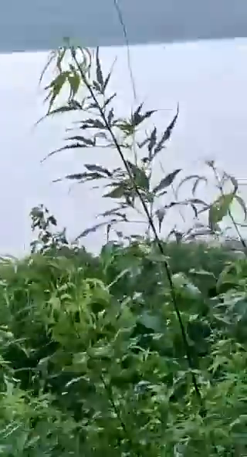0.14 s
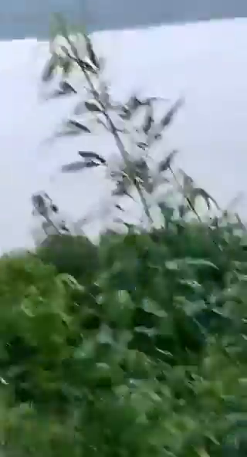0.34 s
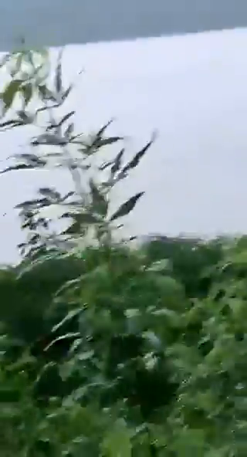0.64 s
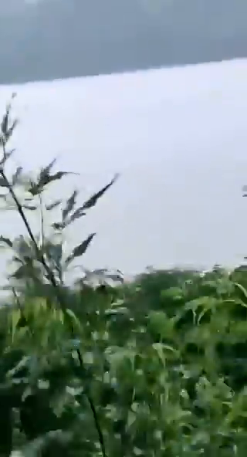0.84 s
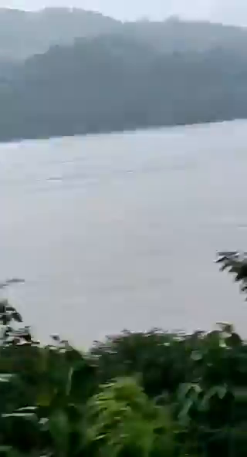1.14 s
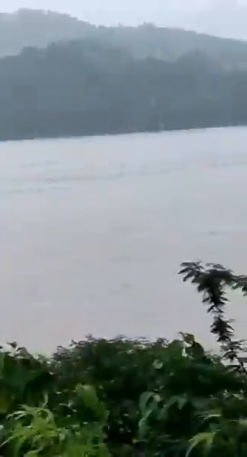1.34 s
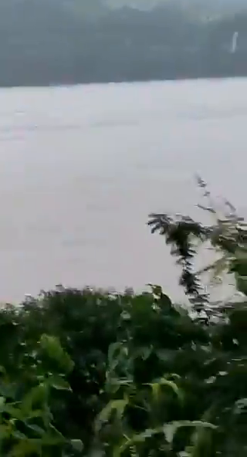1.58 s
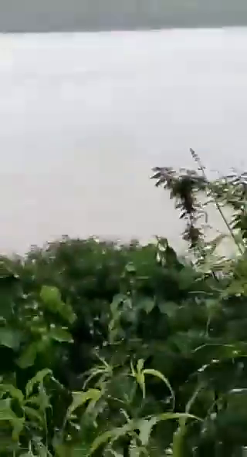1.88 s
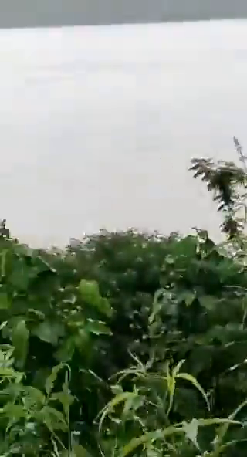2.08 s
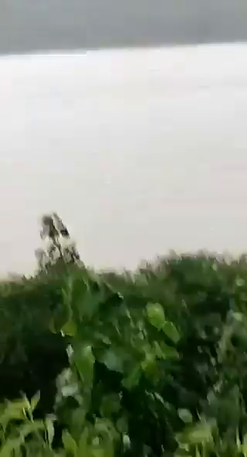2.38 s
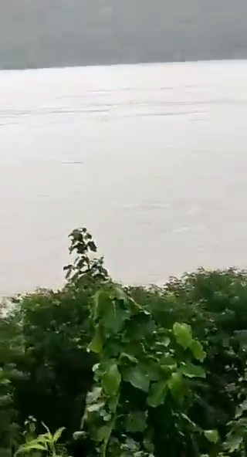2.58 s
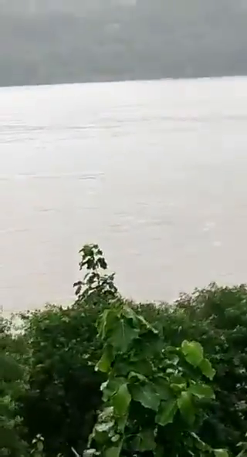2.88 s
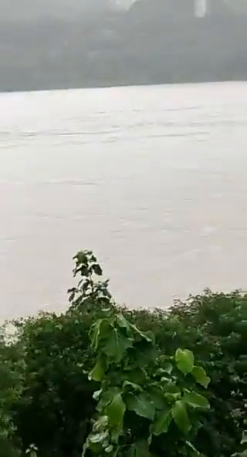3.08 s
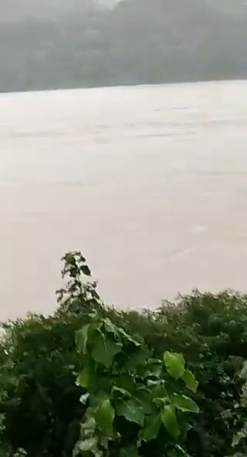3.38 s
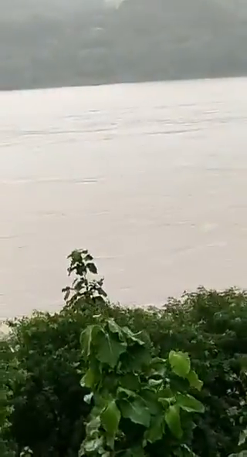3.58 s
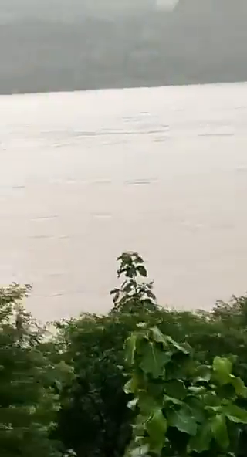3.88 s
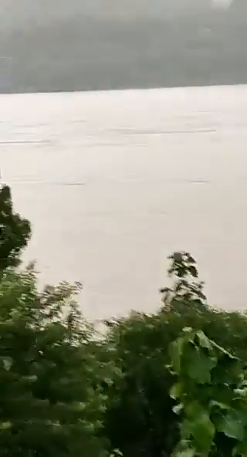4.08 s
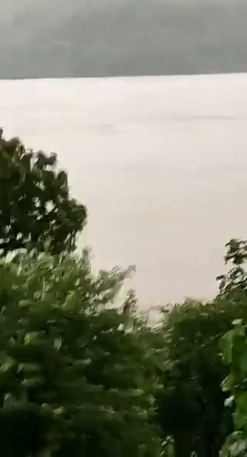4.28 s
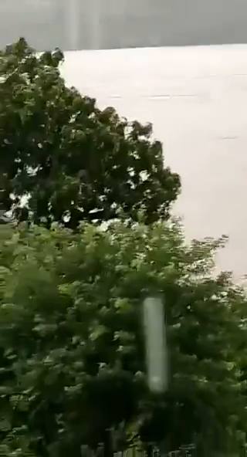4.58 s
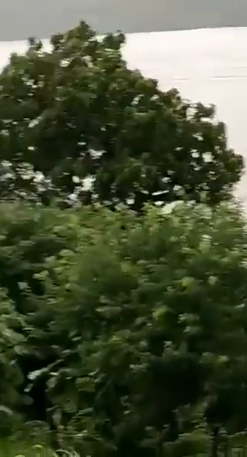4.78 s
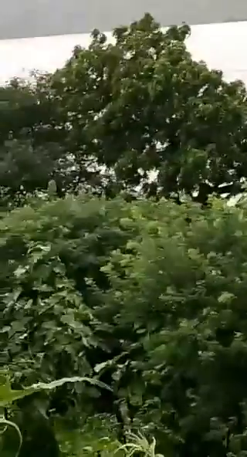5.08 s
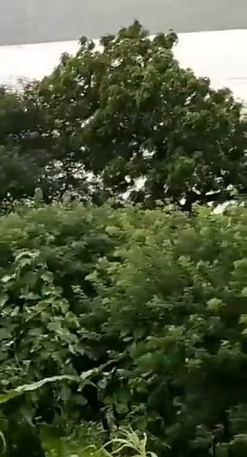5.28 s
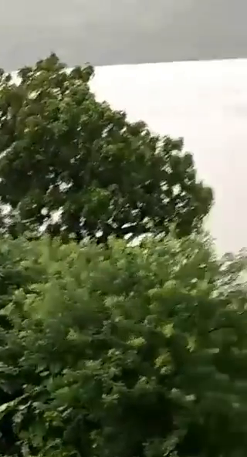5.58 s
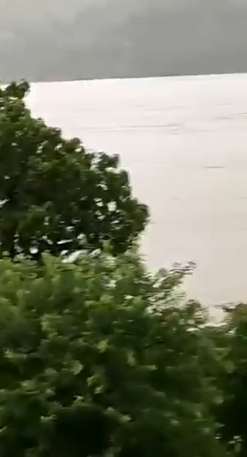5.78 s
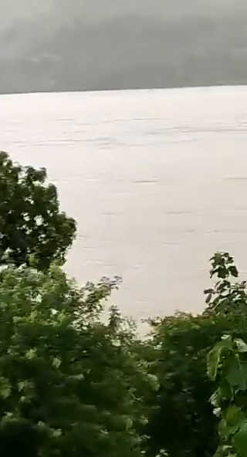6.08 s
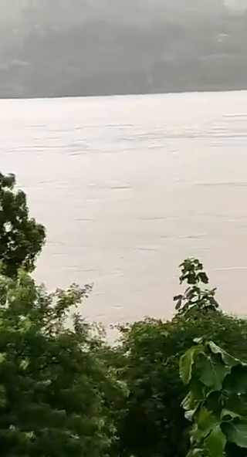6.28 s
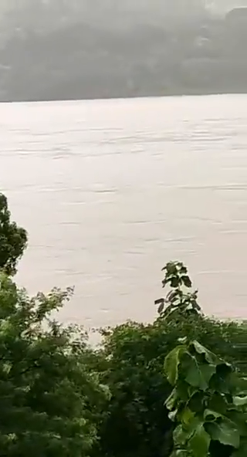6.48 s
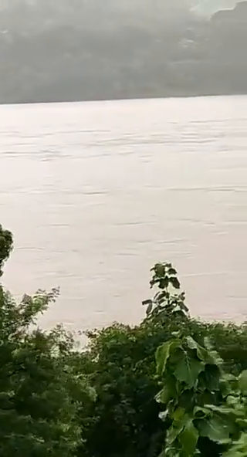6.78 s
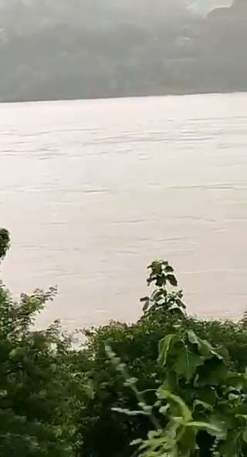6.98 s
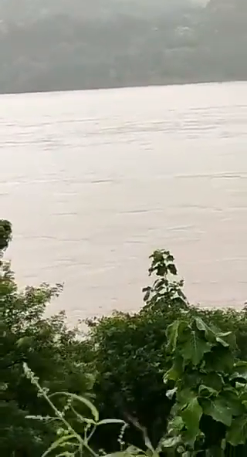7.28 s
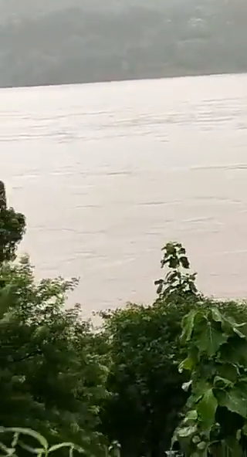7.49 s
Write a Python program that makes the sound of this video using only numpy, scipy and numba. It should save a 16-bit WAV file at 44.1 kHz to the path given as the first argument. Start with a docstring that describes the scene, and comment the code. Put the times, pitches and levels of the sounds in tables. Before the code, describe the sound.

Heavy rain hisses on leaves over a low rushing river, with drops smacking nearby and wind buffeting the microphone at the end.

```python
"""Heavy rain hisses on a bushy bank, over the low rush of a flooded river.
Countless far impacts add up to steady noise; nearer drops patter on leaves or trap ringing bubbles,
and a few fat ones smack close by, exciting the resonances of a leaf. Wet foliage swishes by friction.
A gusty breeze presses its eddies on each of the two ports of a hand-held microphone
and builds to a ragged rumble at the end."""
import sys
import numpy as np
from scipy import signal
from scipy.fft import rfft, irfft, next_fast_len
from scipy.io import wavfile
from scipy.ndimage import uniform_filter1d
from numba import njit

SR = 44100
rng = np.random.default_rng(int(sys.argv[2]) if len(sys.argv) > 2 else 0)


def generate_wav(signal):
    """Clip the signal to [-1, 1] and save it as 16-bit WAV at the path in sys.argv[1]."""
    frames = np.transpose(np.atleast_2d(signal))
    scaled = np.clip(frames, -1, 1) * 32767
    pcm = np.round(scaled).astype(np.int16)
    wavfile.write(sys.argv[1], SR, pcm)


N = 337012
TIME = np.arange(N) / SR
SIZE = next_fast_len(N + 8192, True)
FREQ = np.maximum(np.arange(SIZE // 2 + 1) * SR / SIZE, 1)
SIDES = np.array([[.5], [-.5]])  # each port's share of a pan, the level left minus right
TOP_HZ = 15900


def undb(db):
    """Amplitude ratio of a level in decibels."""
    return np.exp(np.asarray(db) * (np.log(10) / 20))


def unit(x):
    """Normalisation to rms 1."""
    return x / np.sqrt(np.mean(x ** 2))


def fading(t, t60):
    """Exponential decay of 60 dB in t60 seconds."""
    return np.exp(-np.log(1000) * t / t60)


def curves(table):
    """Linear interpolation of (t/s, value, ..) rows: one curve per value column."""
    times, *columns = np.transpose(table)
    return [np.interp(TIME, times, column) for column in columns]


def response(points):
    """Frequency response in dB, interpolated from (f/Hz, level/dB) rows over log frequency."""
    hz, db = np.transpose(points)
    return np.interp(np.log(FREQ), np.log(hz), db)


def filtered(x, gain):
    """Linear filtering: the spectrum is multiplied by a gain per frequency."""
    return irfft(rfft(x, SIZE) * gain, SIZE)[..., :N]


def walk(rate):
    """Random modulation of rms 1: values held for 1 / rate seconds, then smoothed twice."""
    hold = max(int(SR / rate), 2)
    steps = np.repeat(rng.standard_normal(N // hold + 1), hold)
    return unit(uniform_filter1d(uniform_filter1d(steps, hold), hold)[:N])


def add(out, s, sound):
    """Superposition of a stereo sound on out, from s seconds."""
    i = min(max(int(s * SR), 0), N - 1)
    out[:, i:i + sound.shape[1]] += sound[:, :N - i]


def diffuse(colour, alike_hz):
    """A diffuse field: coherent at the two ports below alike_hz, incoherent above."""
    coherence = 1 / (1 + (FREQ / alike_hz) ** 2)
    mid, side = rng.standard_normal((2, len(FREQ))) + 1j * rng.standard_normal((2, len(FREQ)))
    spectra = mid * np.sqrt(1 + coherence) + 2 * SIDES * side * np.sqrt(1 - coherence)
    return unit(irfft(spectra * undb(response(colour)), SIZE)[:, :N])


def swells(rows, rise_share=1):
    """Gaussian envelopes summed in power, as a gain per port; rise_share shortens each rise."""
    power = np.zeros((2, N))
    for peak_s, fall_s, db, pan_db in rows:
        start = max(peak_s - 3 * fall_s, 0)
        t = start + TIME[:int(6 * fall_s * SR)]
        width = fall_s * np.where(t < peak_s, rise_share, 1)
        bell = np.exp(-.5 * ((t - peak_s) / width) ** 2)
        add(power, start, (undb(db + pan_db * SIDES) * bell) ** 2)
    return np.sqrt(power)


def shimmer(x, depth_db, above_hz, size):
    """Independent amplitude modulation of narrow bands: the treble flickers."""
    hz, _, bands = signal.stft(x, SR, nperseg=size)
    spread_db = depth_db / (1 + (above_hz / (hz[:, None] + 1)) ** 2)
    gain = undb(spread_db * np.tanh(rng.standard_normal(bands.shape[1:])))
    gain = gain / np.sqrt(np.mean(gain ** 2, axis=1, keepdims=True))
    return unit(signal.istft(bands * gain, SR, nperseg=size)[1][:, :N])


@njit
def low_pass(x, hz, damping):
    """Two-pole state-variable low-pass whose corner moves every sample."""
    y, band, low = np.empty(len(x)), 0., 0.
    for i in range(len(x)):
        g = np.tan(np.pi * min(hz[i], .4 * SR) / SR)
        v = (band + g * (x[i] - low)) / (1 + g * (g + damping))
        y[i] = low + g * v
        band, low = 2 * v - band, 2 * y[i] - low
    return y


# Spectrum of the river's rush: f/Hz, level/dB
RIVER_SPECTRUM = [(20, 4.5), (50, 1), (85, 4.5), (130, 0.5), (190, -1.5), (260, -3), (420, -14.5),
                  (700, -19), (1500, -17), (4000, -55)]
# Growth of the rush: t/s, level/dB
RIVER_LEVEL = [(0, -58), (2.2, -52), (3.3, -49.5), (5.2, -45), (7.64, -43.5)]


def river():
    """Turbulent flood water radiates broad, low noise that surges a little."""
    return diffuse(RIVER_SPECTRUM, alike_hz=915) * undb(curves(RIVER_LEVEL)[0] + walk(5.94))


# Rain on the bushes, shifting as the microphone turns: t/s, level/dB, pan/dB
BUSH_LEVEL = [(0, -47.5, 1), (.7, -47, 2), (1.3, -47, 3), (2, -46.5, 1), (3.3, -48, 0.5), (4.8, -47, 0.5),
              (6, -47.5, 0), (7.64, -48, .5)]


def bush_level():
    """Direction gives a level difference between the ports: the rain's reference level in dB at each."""
    level_db, pan_db = curves(BUSH_LEVEL)
    return level_db + pan_db * SIDES


# Spectra of the bright hiss off bushes, dull wash off water, hollow drumming in trees: f/Hz, level/dB
HISS_SPECTRUM = [(700, -10), (1500, -1), (2100, 2), (2700, -1), (3600, 0.5), (4300, -2.5), (5200, -1),
                 (6100, -3), (7500, -1), (9500, -2.5), (11000, -6), (13000, -11), (16000, -17)]
WASH_SPECTRUM = [(150, -10), (350, 2), (550, 1), (850, 1.5), (1200, -1), (1900, -3), (2700, -25),
                 (5000, -24), (12000, -26)]
CROWN_SPECTRUM = [(200, -28), (550, -8.5), (830, 0), (1100, -.5), (1500, -5.5), (2000, -6.5), (3500, -30),
                  (8000, -53)]
# Drumming in the tree crowns, loudest while the microphone faces them: t/s, level/dB
CROWN_LEVEL = [(0, -64), (1, -69), (1.4, -56.5), (4.2, -58), (4.6, -50), (5.3, -49.5), (5.6, -52.5),
               (6.2, -52.5), (6.8, -61), (7.64, -52)]


def far_rain(bush_db, wash_db):
    """Incoherent summation: drops too far to tell apart merge into noise, coloured by what they hit."""
    hiss = shimmer(diffuse(HISS_SPECTRUM, alike_hz=845), depth_db=11.5, above_hz=1960, size=1024)
    hiss *= undb(bush_db + 3.5 + 0.46 * walk(20))
    wash = diffuse(WASH_SPECTRUM, alike_hz=830) * undb(wash_db + 0.089 * walk(13))
    crowns = diffuse(CROWN_SPECTRUM, alike_hz=700) * undb(curves(CROWN_LEVEL)[0] + 0.36 * walk(8.9))
    return hiss + wash + crowns


# Spectrum of fine droplets: f/Hz, level/dB
SPRAY_SPECTRUM = [(1000, -10), (3000, -2.5), (5500, -3), (7500, 2.5), (9500, 4.5), (11500, 1.5), (13500, 0),
                  (16000, -2)]
# Brief, bright spatters close by: peak t/s, half width/s, level/dB
SPATTERS = [(0.016, .018, -53), (0.316, .015, -45), (0.346, .014, -45), (.865, .018, -48),
            (1.28, 0.027, -46), (1.339, .014, -41), (1.54, .012, -51), (1.613, .015, -42),
            (1.678, .008, -46), (1.903, .01, -45), (2.24, 0.036, -48), (2.41, .012, -52),
            (2.753, .006, -40), (2.882, 0.0045, -38), (2.974, .006, -42), (3.094, .012, -40.5),
            (3.138, .012, -44.5), (3.198, .008, -49), (3.288, 0.0099, -43), (3.382, .007, -42.5),
            (3.88, 0.013, -45), (3.913, .005, -38.5), (3.957, 0.014, -43), (4.06, .008, -48),
            (4.293, .008, -45), (4.45, .01, -50), (4.822, 0.0095, -39), (4.855, .012, -41),
            (4.975, .02, -48), (5.116, .007, -43), (5.176, .018, -42), (5.5, .013, -41.5),
            (6.052, 0.014, -43), (6.116, 0.0081, -41.5), (6.218, 0.011, -42), (6.377, .008, -43),
            (6.414, 0.01, -44), (7.036, .008, -48), (7.334, .012, -41), (7.422, 0.03, -43.5),
            (7.57, .008, -44)]


def spray(grain_db):
    """Droplets fall off the leaves in showers; size sets pitch, so their spectrum keeps shifting."""
    grains = rng.standard_normal((2, N)) * undb(grain_db * walk(1500))
    droplets = filtered(grains, undb(response(SPRAY_SPECTRUM)))
    droplets = shimmer(droplets, depth_db=16, above_hz=2600, size=512)
    thinning_db = 0.5 * np.maximum(TIME - 2.4, 0)  # the light showers slowly thin out
    showers = undb(-54.5 + 6.5 * np.tanh(walk(30)) - thinning_db)
    spatters = swells([(s, half_s, db, 0) for s, half_s, db in SPATTERS])
    return droplets * np.hypot(showers, spatters) * undb(np.tanh(walk(110)))


# Spectrum of rubbing leaves: f/Hz, level/dB
SWISH_SPECTRUM = [(300, -2), (900, 3.5), (2000, 9), (3000, 5.5), (4500, 7), (7500, 7), (10000, 4),
                  (13000, -5), (16000, -36)]
# Swishes that start quickly and ease off: peak t/s, fall time/s, level/dB, pan/dB
FOLIAGE_SWISHES = [(.305, 0.079, -43.5, 3), (.87, 0.072, -41, 1.5), (1.29, 0.083, -49.5, 3),
                   (1.525, 0.049, -41, 1), (2.205, 0.068, -39.5, 3.5), (2.265, 0.053, -39.5, 2),
                   (2.87, 0.082, -45.5, -1), (4.34, 0.063, -44, 3), (4.66, .04, -44, 5),
                   (4.95, 0.028, -49, 8)]


def foliage(grain_db):
    """Friction between wet leaves makes swells of dense, uneven scratches."""
    scratches = rng.standard_normal((2, N)) * undb(grain_db * walk(700) + 1.8 * np.tanh(walk(90)))
    rustle = unit(filtered(scratches, undb(response(SWISH_SPECTRUM))))
    return rustle * swells(FOLIAGE_SWISHES, rise_share=0.39)


# The breeze dies down, then freshens, at the left port first: t/s, left level/dB, right level/dB
BREEZE_LEVEL = [(0, -33.5, -35.5), (.7, -39, -40), (2.4, -40, -43), (3.1, -47.5, -45.5),
                (4.1, -45.5, -46.5), (5.8, -41, -40.5), (5.96, -30, -39), (6.2, -27, -37),
                (6.56, -27.5, -40.5), (6.7, -25, -25), (7, -28.5, -26.5), (7.13, -22.5, -23.5),
                (7.3, -18, -26), (7.47, -19.5, -19), (7.64, -18.5, -28)]
# Single gusts: peak t/s, fall time/s, level/dB, pan/dB
WIND_GUSTS = [(.15, 0.12, -39, 12.5), (.32, 0.019, -38.5, -12), (.44, 0.043, -37.5, -6),
              (.79, 0.04, -44, -12), (.965, 0.06, -35, -9), (1.12, 0.028, -44.5, -14),
              (1.28, 0.035, -36.5, -13), (1.38, 0.052, -38, 6), (1.48, 0.044, -36, -5),
              (1.67, 0.028, -38, -16), (1.93, 0.094, -40, 21), (2.02, 0.13, -38, 10),
              (2.125, 0.047, -31.5, -5), (2.23, 0.051, -45, -10), (2.44, 0.03, -41, -10),
              (2.54, 0.035, -45.5, 14), (2.71, 0.1, -43.5, 17), (4.3, 0.13, -44.5, 12),
              (4.68, 0.036, -40, 2), (4.87, 0.025, -34.5, 0), (5.14, 0.039, -38.5, 9), (5.5, 0.14, -40, 6),
              (5.96, 0.023, -36, 9), (6.045, 0.034, -32, -3), (6.32, 0.041, -31, 17),
              (6.425, 0.04, -32.5, 16.5), (6.535, 0.026, -34, 23.5), (6.64, 0.043, -32, 8),
              (6.71, .025, -31.5, 12), (6.755, 0.05, -33, -9), (6.85, 0.026, -29, 18),
              (6.95, 0.013, -24.5, -10.5), (7.04, 0.048, -26, 1), (7.175, 0.037, -26.5, 18),
              (7.26, 0.044, -21.5, 16), (7.345, 0.036, -17.5, 4.5), (7.42, 0.064, -23, -11.5),
              (7.53, .06, -26, 8)]
GUST_RISE_SHARE = 0.47  # rise time over fall time


def wind_level():
    """A wavering breeze and its gusts add in power: the level in dB at each port."""
    breeze = undb([db + 0.63 * walk(12) for db in curves(BREEZE_LEVEL)])
    return 20 * np.log10(np.hypot(breeze, swells(WIND_GUSTS, GUST_RISE_SHARE)))


def wind(db, corner_hz, db_per_octave, body_hz, thump):
    """Turbulence at one port: stronger wind has smaller eddies, so its rumble reaches higher."""
    buffets = np.tanh(walk(28))
    octaves = (db + 18.5) / db_per_octave + 0.33 * buffets + 0.088 * walk(18)
    # large, slow eddies carry most of the pressure
    spectrum = 1 / np.sqrt((1 + (FREQ / body_hz) ** 2) * (1 + (14 / FREQ) ** 4))
    eddies = filtered(rng.standard_normal(N), spectrum)
    for _ in range(2):
        eddies = low_pass(eddies, corner_hz * 2 ** octaves, damping=1.71)
    speed = unit(eddies)
    # pressure grows with the square of the air speed, so the fastest eddies thump
    pressure = speed + thump * (speed ** 2 - 1)
    return unit(pressure) * undb(db - 0.5 * buffets)


# Spectrum of wind tearing across the ports: f/Hz, level/dB
TEARING_SPECTRUM = [(80, -7), (160, 1), (280, 0), (380, -2), (480, -14), (700, -22), (1400, -48),
                    (4000, -80)]
# The hardest blasts: peak t/s, fall time/s, level/dB, pan/dB
BLASTS = [(7.11, 0.062, -40.5, 8), (7.185, 0.046, -30.5, 17), (7.265, 0.019, -30.5, 22.5),
          (7.35, .025, -38, 13), (7.42, 0.051, -30.5, -13), (7.51, 0.031, -33.5, 20.5),
          (7.62, .033, -38.5, 20)]


def tearing():
    """Small-scale turbulence adds a rough, higher flutter in the hardest blasts."""
    eddies = unit(filtered(rng.standard_normal((2, N)), undb(response(TEARING_SPECTRUM))))
    return eddies * swells(BLASTS, GUST_RISE_SHARE) * undb(3.7 * np.tanh(walk(70)))


# Spectral weighting of single drops: f/Hz, level/dB
DROP_SPECTRUM = [(700, -3), (2000, 12), (3500, -11), (4500, -12), (7500, -3), (10000, 5.5), (13000, -6),
                 (16000, 8)]


def drops(count, low_hz, high_hz, ring_s, glide, crack, spread_db, pan_db):
    """Damped oscillations of random time, size, pitch and side, with noise in proportion to crack."""
    when, size, pitch, side, wetness = rng.random((count, 5)).T[:, :, None]
    t = TIME[:min(int(ring_s * SR), 2048)]
    hz = np.minimum(low_hz * (high_hz / low_hz) ** pitch, TOP_HZ)
    ring = np.sin(2 * np.pi * hz * t * (1 + glide * t / ring_s))
    noise = crack * rng.standard_normal((count, len(t)))
    db = -spread_db * np.log(size + 0.021)  # many small drops, few large
    sounds = (ring + noise) * undb(db) * fading(t, ring_s * (.5 + wetness))
    out = np.zeros((2, N))
    for s, sound, pan in zip(when[:, 0] * N / SR, sounds, pan_db * (2 * side - 1)):
        add(out, s, sound * undb(pan * SIDES))
    return unit(filtered(out, undb(response(DROP_SPECTRUM))))


def bubbles(bush_db):
    """Bubble resonance: air trapped by drops on standing water pings faintly, rising as it fades."""
    pings = drops(count=800, low_hz=2770, high_hz=14050, ring_s=0.05, glide=0.02,
                  crack=0, spread_db=1.5, pan_db=39)
    return pings * undb(bush_db - 13.5)


def patter(bush_db):
    """Heavily damped impacts on nearby leaves: dry ticks that come in flurries."""
    ticks = drops(count=1000, low_hz=3300, high_hz=12660, ring_s=0.0046, glide=0,
                  crack=0.48, spread_db=3, pan_db=28)
    return ticks * undb(bush_db - 12.5 + walk(26))


def leaf(blow, hz):
    """The broad resonance of a wet leaf acts as a band-pass on a blow; peak 1."""
    edges = np.clip([hz / 1.38, hz * 1.34], 100, .45 * SR)
    hit = signal.sosfilt(signal.butter(2, edges, "band", fs=SR, output="sos"), blow)
    return hit / np.abs(hit).max(axis=1, keepdims=True)


# Fat drops on the nearest leaves: t/s, level/dB, f/Hz, pan/dB, splash decay/s, relative snap level/dB
FAT_DROPS = [(1.723, -23, 6900, 5, .009, -16), (1.7914, -22, 7460, 14, 0.0036, -13),
             (1.8525, -21, 5530, 13, .003, -11), (2.0709, -11.5, 7500, 33, 0.0033, -3.5),
             (2.1154, -20, 7200, 13, .003, -15), (2.161, -21.5, 7000, 8, .007, -10),
             (2.27, -21, 6500, 9, .005, -20), (2.493, -22.5, 8900, 8, 0.0046, -18),
             (2.705, -29, 8000, 3, .005, -7), (2.872, -29, 3300, 3, .014, -9),
             (3.06, -31.5, 2400, 3, .018, -15), (3.295, -26.5, 3500, 10, .009, -4),
             (3.453, -24.5, 6300, 5, .004, -3), (4.0093, -21, 7200, 10, .003, -13),
             (4.618, -18, 9200, 8, .004, -18), (4.652, -15.5, 7560, 8, .004, -15),
             (4.657, -19.5, 7600, 9, 0.0092, -13), (4.665, -28, 8200, 5, .004, -3),
             (4.7108, -22, 9100, 15, .004, -17), (4.793, -20.5, 10200, -4, 0.018, -12),
             (4.94, -21, 6400, 8, .005, -9), (4.953, -26.5, 8800, 10, .006, 0),
             (4.961, -25.5, 8000, 4, .007, -13), (5.091, -27, 6400, 2, .02, -15),
             (5.276, -19.5, 8300, 3, .0035, -15), (7.412, -23, 8550, 5, .013, -16),
             (7.575, -22, 8500, 16, .004, -6)]


def smacks(body_ratio):
    """Impact excitation: the struck spot smacks, the whole leaf snaps lower, flung droplets crackle."""
    out, t = np.zeros((2, N)), TIME[:4096]
    impact = 4 * (t == 0)
    for s, db, hz, pan_db, splash_s, snap_db in FAT_DROPS:
        splash, flap, droplets, sizes = rng.standard_normal((4, 2, len(t)))
        crackle = droplets * undb(7.7 * sizes - 15.5) * fading(t, t60=0.032)
        blow = impact + splash * fading(t, splash_s) + crackle
        snap = 0.59 * impact + flap * fading(t, t60=0.0038)
        hit = leaf(blow, hz) + undb(snap_db) * leaf(snap, hz * body_ratio)
        add(out, s, hit * undb(db + pan_db * SIDES - abs(pan_db) / 2))
    return out


# Difference in response between the ports: f/Hz, left minus right level/dB
PORT_DIFFERENCE = [(300, -0.5), (700, 0.5), (1200, 1), (2000, 4), (2700, -1.5), (3600, 2), (4500, -0.5),
                   (7500, 2), (10000, 0), (12500, -3), (15500, -2.5)]


def scene():
    """Superposition: rain, river and leaves reach both ports; the wind strikes each on its own."""
    bush_db = bush_level()
    rain = far_rain(bush_db, wash_db=-49.5) + patter(bush_db) + bubbles(bush_db) + spray(grain_db=2)
    ambience = rain + river() + foliage(grain_db=3)
    ambience = filtered(ambience, undb(SIDES * response(PORT_DIFFERENCE)))
    rumble = np.array([wind(db, corner_hz=264, db_per_octave=12.5, body_hz=53.4, thump=0.12)
                       for db in wind_level()])
    return ambience + smacks(body_ratio=0.42) + rumble + tearing()


def record(dry):
    """Band limiting and soft saturation: the microphone loses both extremes and rounds hard thumps."""
    bass_cut = signal.butter(2, 11, "high", fs=SR, output="sos")
    treble_cut = signal.ellip(10, .1, 80, TOP_HZ, fs=SR, output="sos")
    rounded = .9 * np.tanh(signal.sosfilt(bass_cut, dry) / .9)
    return signal.sosfilt(treble_cut, rounded)


dry = scene()
out = record(dry)
generate_wav(out)
```